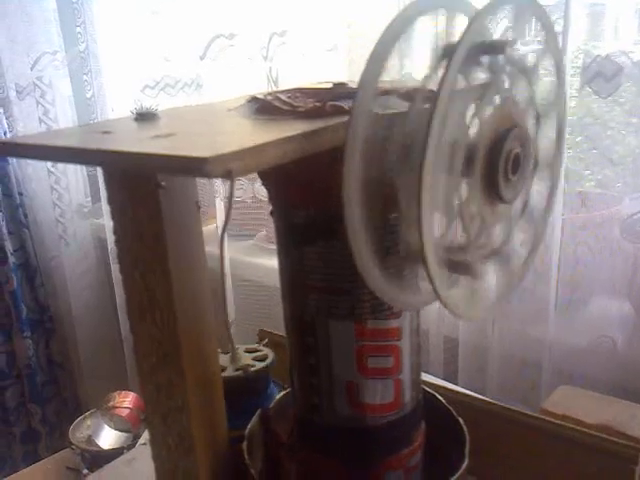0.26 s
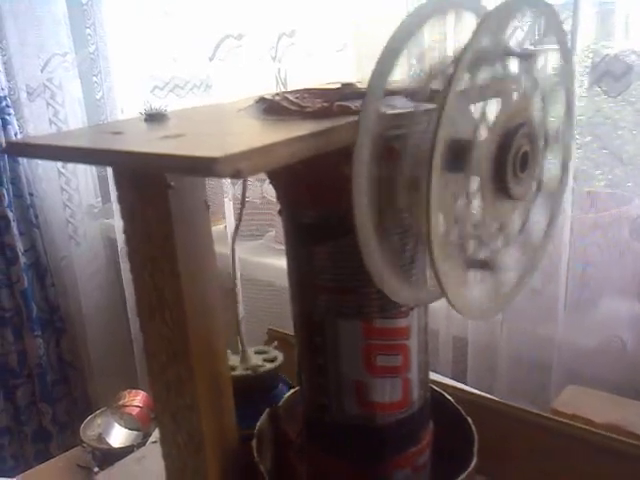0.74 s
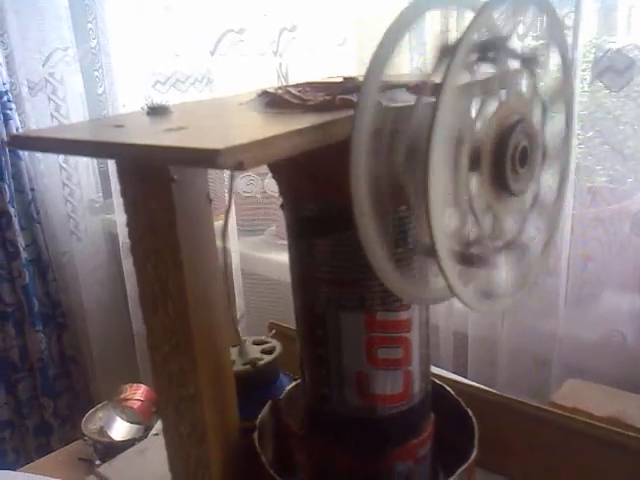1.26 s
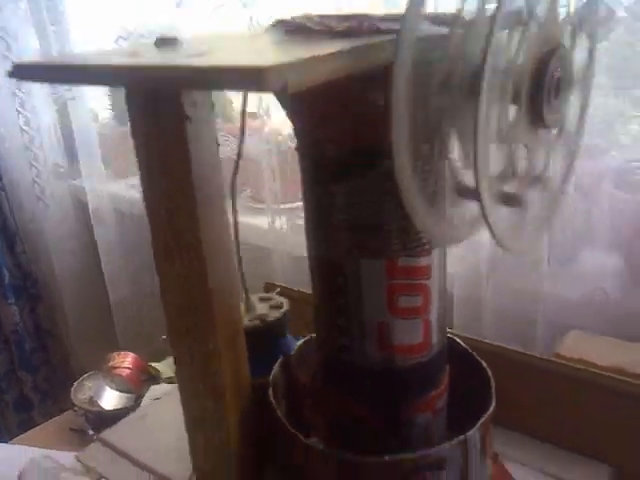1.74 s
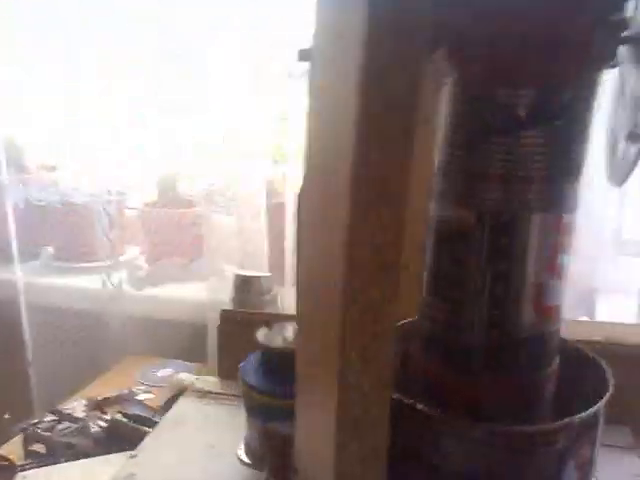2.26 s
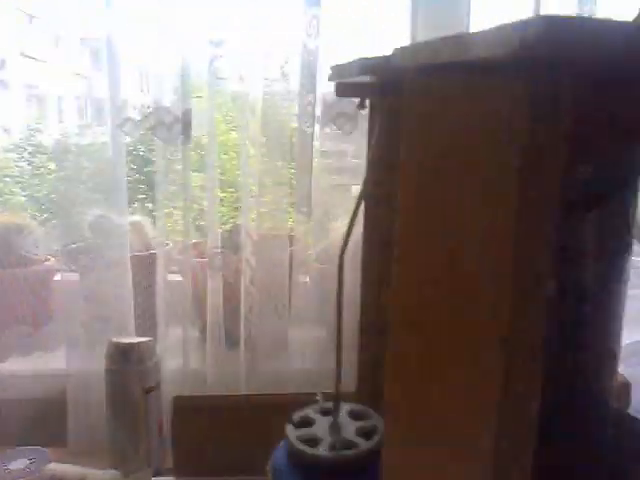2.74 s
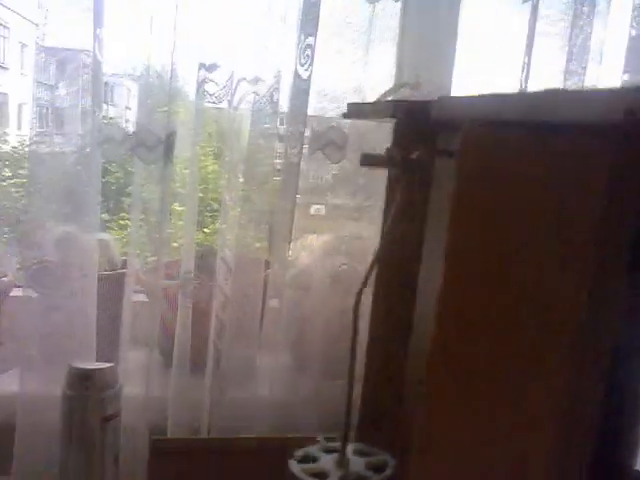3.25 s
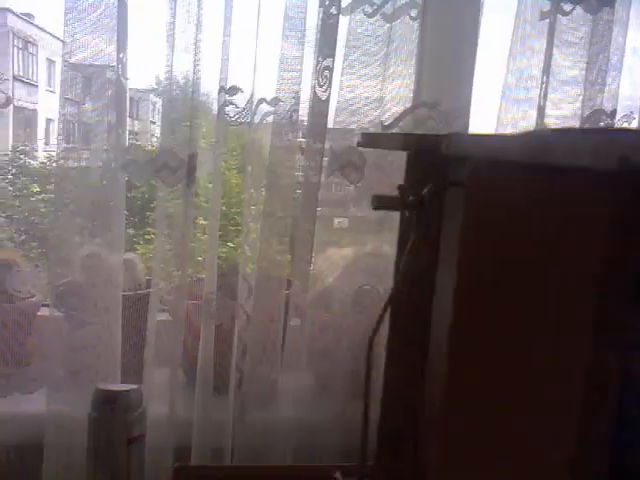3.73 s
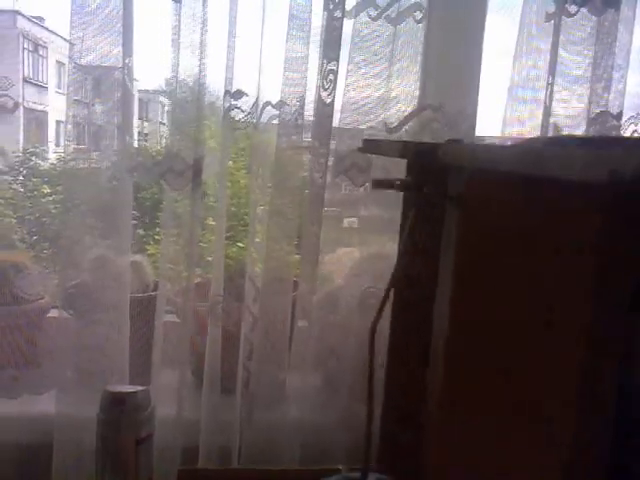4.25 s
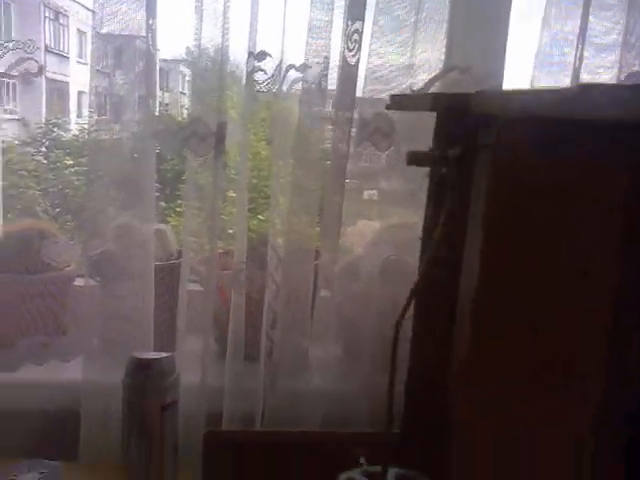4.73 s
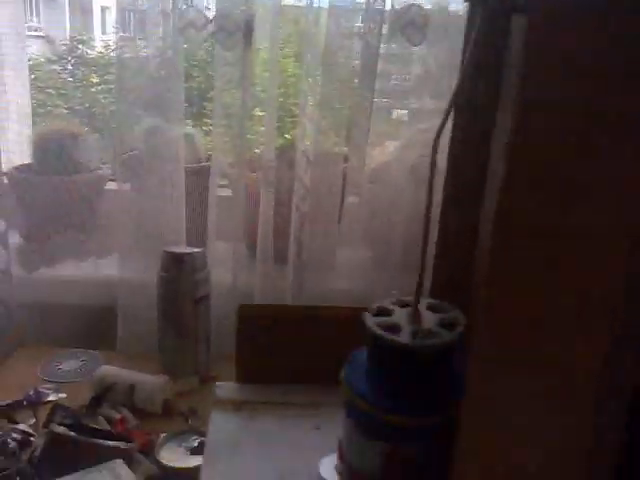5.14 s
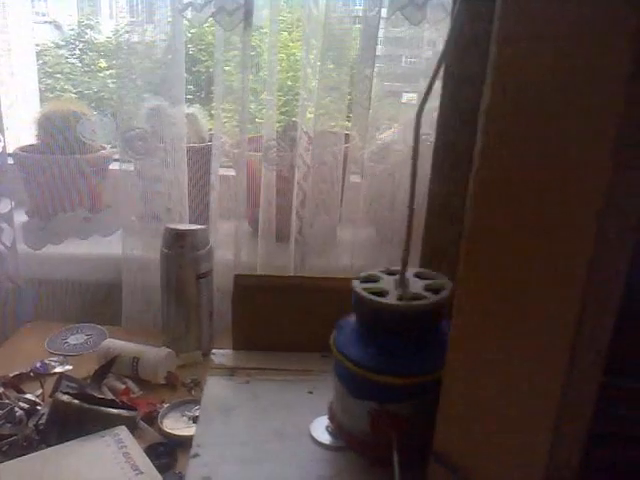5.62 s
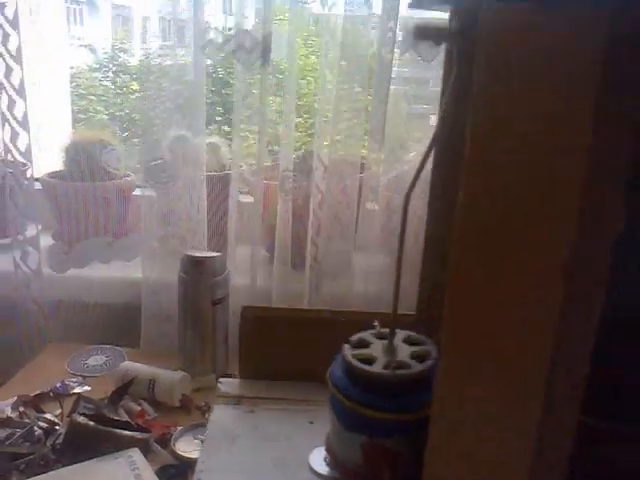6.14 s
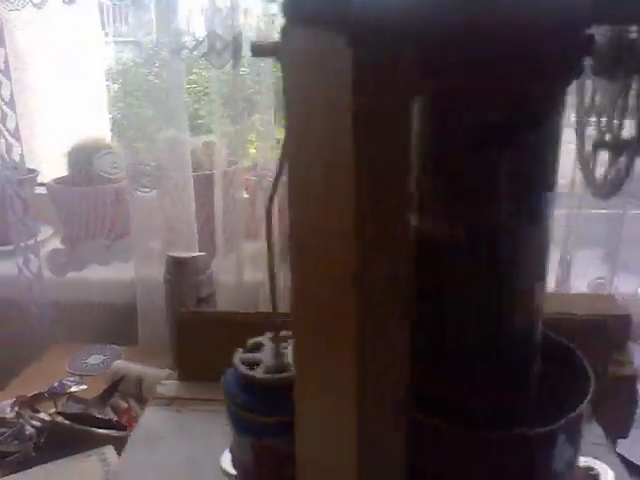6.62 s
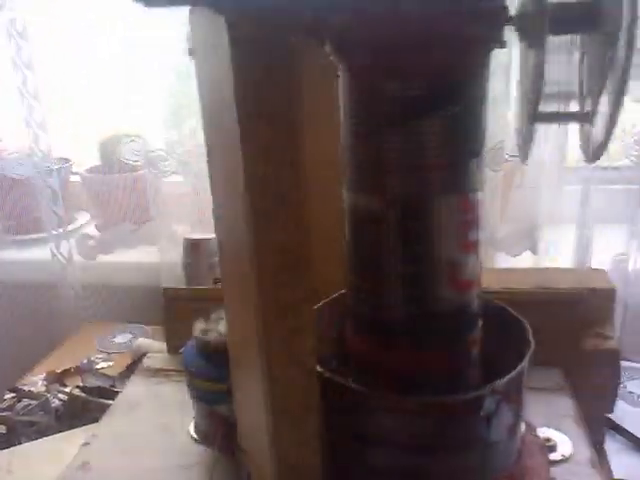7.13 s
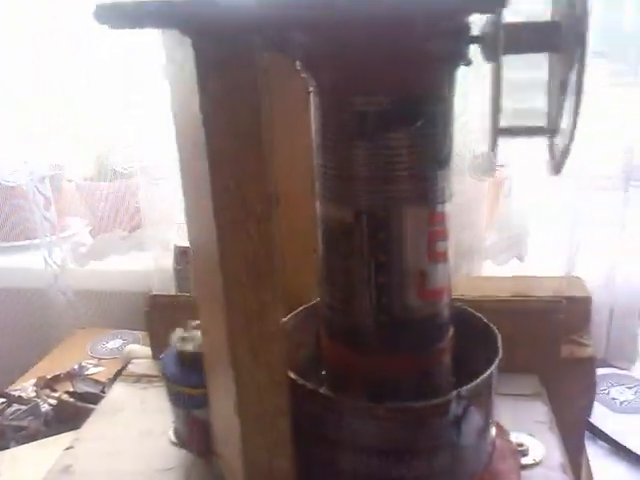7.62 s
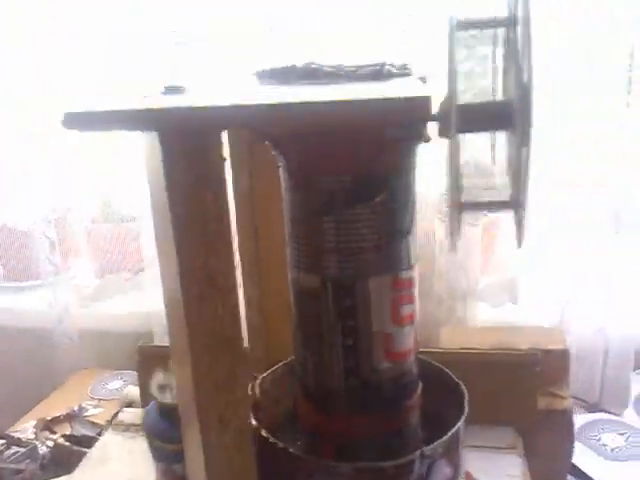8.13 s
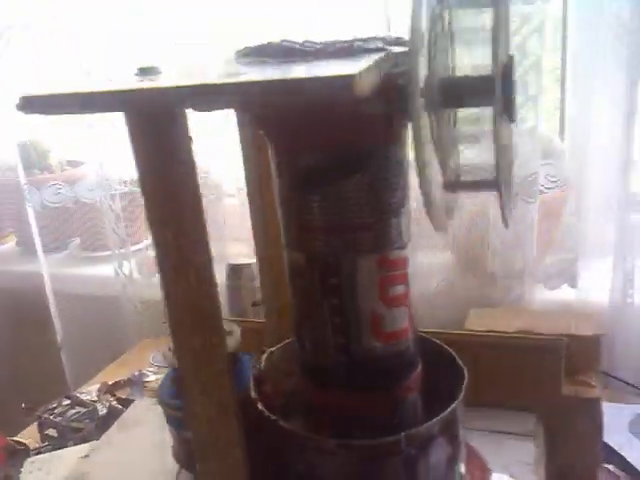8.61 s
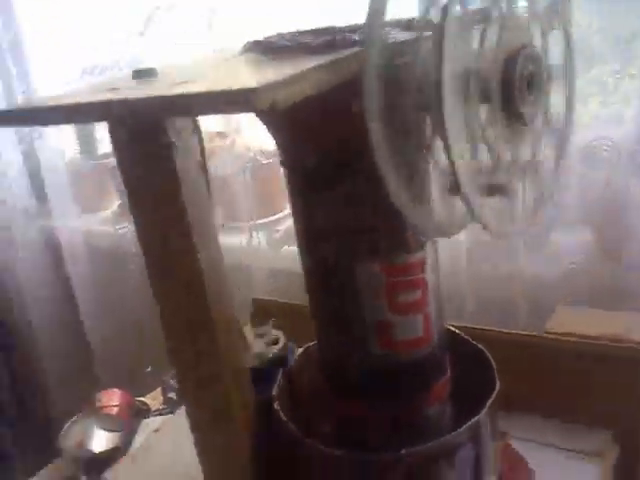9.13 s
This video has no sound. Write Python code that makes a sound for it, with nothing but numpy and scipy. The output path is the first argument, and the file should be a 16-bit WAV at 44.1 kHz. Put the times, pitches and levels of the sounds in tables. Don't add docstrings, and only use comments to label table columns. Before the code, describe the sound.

A small tin-and-wire engine runs without pause, its joints knocking drily some twenty times a second, alternately stronger and weaker. Thin wire ticks and brief metallic ringing edge each knock, with soft rubbing and low hum beneath. Heard close in a curtained room, it grows louder and duller after two seconds as the microphone moves to the crank side, then eases back near the end. A loose rod slaps in irregular bunches, mostly before six and a half seconds.

```python
import sys
import numpy as np
from scipy import signal
from scipy.fft import rfft, irfft
from scipy.io import wavfile
from scipy.ndimage import uniform_filter1d

SR = 44100
rng = np.random.default_rng(int(sys.argv[2]) if len(sys.argv) > 2 else 0)


def inscribe(sig):
    pcm = np.round(np.clip(np.atleast_2d(sig).T, -1, 1) * 32767)
    wavfile.write(sys.argv[1], SR, pcm.astype(np.int16))


def gain_from_decibels(decibels):
    exponent = np.asarray(decibels, float) / 20
    return 10 ** exponent


N = 412770

# start_s, place (0 flywheel front, 1 crank side, 2 flywheel edge)
PHONE_PATH = [
    (0, 0),
    (1.9, 0.05),
    (2.3, 1),
    (6.2, 1),
    (7.5, 1.85),
    (8.6, 2),
    (9.4, 2),
]
# start_s, speed_turns_per_s
CRANK_SPEED = [(0, 10.646), (0.42, 10.792), (1.65, 10.86), (2.02, 10.627), (2.99, 10.887), (3.77, 10.881),
               (4.09, 10.775), (5.11, 10.849), (6.23, 10.546), (6.66, 10.8), (7.18, 10.86), (8.0, 10.707),
               (8.88, 10.752), (9.4, 10.707)]
# start_s, top_knock_db, link_tick_db
DISTANCE_LEVELS = [(0, -17, -29), (.6, -15.5, -29.5), (1.95, -15.5, -28.5), (2.25, -10.5, -25.5),
                   (2.6, -10, -27.5), (3.4, -11.5, -29), (6.1, -11, -29), (6.55, -12, -30.5),
                   (7.9, -14, -29.5), (9.4, -16.5, -33)]
BOTTOM_UNDER_DB = -4.5, -7, -6.5
# start_s, chatter_db
ROD_PLAY = [(0, -42.5), (1.2, -34.5), (1.9, -41.5), (2.7, -55), (3.8, -39.5), (4.6, -37), (4.75, -45),
            (6.1, -43), (6.5, -54), (7.3, -47), (7.65, -35.5), (9.4, -36.5)]
# delay_ms, front_push, side_push, edge_push (pushes as signed share)
TOP_CONTACTS = [(0.27, -1.13, -0.46, -0.67), (1.55, 0.09, -0.25, -0.51), (2.38, 1.15, 1.17, 1.13),
                (6.52, -0.24, -0.49, -0.5), (11.56, -0.2, 0.27, -0.1), (16.02, -0.1, 0.01, -0.1)]
BOTTOM_CONTACTS = [(-1.08, 1.18, 1.21, 1.26), (0.06, -0.69, -0.22, 0.24), (3.13, 0.55, 0.36, 0.55),
                   (6.7, 0.01, 0.14, 0.17), (13.81, 0.12, 0.08, 0.1)]
# pitch_hz, t60_s, front_swing, side_swing, edge_swing (swings as signed gain)
TOP_FRAME_MODES = [(522, 0.019, -1.01, 0.18, -0.14), (587, 0.017, 0.5, 0.17, 0.32),
                   (656, 0.067, -0.12, 0.06, 0.03), (748, 0.027, 0.17, 0.4, 0.42),
                   (827, 0.057, 0.42, 0.24, 0.43), (887, 0.053, 1.09, 0.36, 0.74),
                   (957, 0.036, 0.89, 2.04, -0.29), (1016, 0.13, -0.3, -0.02, 0.76),
                   (1092, 0.012, 0.7, -0.23, 1.32), (1112, 0.11, 0.08, 0.33, 0.31),
                   (1190, 0.023, -0.74, -0.09, -1.34), (1299, 0.13, -0.1, -0.17, -0.25),
                   (1372, 0.068, -0.96, -0.68, -0.06), (1429, 0.13, 1.75, -0.12, 0.05),
                   (1555, 0.012, -1.17, -0.69, -1.04), (1669, 0.012, -0.13, -1.56, -0.8),
                   (1788, 0.051, 0.14, -0.17, 0.11), (1949, 0.027, 0.02, -0.83, -0.49),
                   (2150, 0.025, -0.17, 0.0, -0.47), (2666, 0.012, -0.25, -0.12, -0.67),
                   (2919, 0.012, -0.36, -0.66, -0.71), (3405, 0.006, -0.01, -1.5, -0.13)]
BOTTOM_FRAME_MODES = [(501, 0.13, 0.0, -0.12, -0.1), (571, 0.041, -0.13, -0.66, -1.1),
                      (645, 0.021, -1.29, 0.83, 1.01), (772, 0.031, 0.18, 1.39, 0.61),
                      (853, 0.13, 0.98, 0.42, 0.19), (883, 0.038, 2.62, 0.91, 0.78),
                      (980, 0.059, -0.85, 0.31, -0.74), (997, 0.018, 0.18, 0.35, 2.17),
                      (1120, 0.079, 0.21, 0.08, 0.28), (1164, 0.012, -0.82, -2.11, -1.34),
                      (1215, 0.107, 0.08, 0.11, 0.17), (1303, 0.059, 0.06, -0.85, -1.04),
                      (1353, 0.13, -0.12, -0.08, -0.17), (1468, 0.017, -0.92, -1.2, -2.23),
                      (1569, 0.035, -0.26, 1.43, 1.7), (1657, 0.021, 0.51, -0.81, -0.35),
                      (1776, 0.053, -0.6, 1.19, 0.13), (1975, 0.049, -0.48, 0.21, -0.09)]
# delay_ms, length_ms, level_db
TOP_TICKS = [
    (-5.5, 3.5, -0.5),
    (27.5, 7.7, -10.5),
]
BOTTOM_TICKS = [
    (-6, 1.42, -6.5),
    (-2.5, 4, -9.5),
    (0, 3.1, -24),
    (21, 5.5, -46),
]
LINK_MODES = [(2280, 0.02, 0, -22, 0.5), (3685, 0.0058, 3.5, 5.5, 5), (4420, 0.018, -4.5, 0.5, -1),
              (4740, 0.014, -13, -6, -7), (5677, 0.012, -7.5, -4.5, -1.5), (6060, 0.015, -3, -2, -4),
              (7020, 0.013, -12.5, -7, -4), (8900, 0.0071, -26, -10, -14), (9680, 0.012, -17, -16, -14),
              (11250, 0.0055, -12.5, -23, -16), (14000, .004, -21, -15, -21)]
ROD_MODES = [(1040, .02, 16, -22, 10), (2080, 0.02, 9, 2, 6), (3045, 0.032, 6, 4, 6),
             (4420, 0.041, -8, -13, -4.5), (6500, 0.0079, -10, -13, -7), (7400, 0.022, -16, -10, -15),
             (10200, 0.0086, -13, -9, -13)]
BOARD_MODES = [(333.4, 0.47, -33, -29, -31.5), (391, 0.089, -26, -18, -20), (432.6, 0.17, -42, -27.5, -30),
               (471.5, 0.16, -26, -19, -18.5), (640, 0.057, -30, -17, -14.5), (1090, 0.062, -8, -12, -13),
               (1793, 0.14, -16, -18, -17), (1870, 0.038, -19, -7, -18), (2026, 0.058, -17, -46, -12.5),
               (2230, 0.053, -31, -17.5, -20)]
PIN_MODES = [(8560, 0.0024, -2, 4, 2), (10400, 0.0037, -1, 4, 2), (12000, 0.0037, -2, 3, 0),
             (14500, 0.0045, -9, 3, -6)]
CRACK_MODES = [(2660, 0.0026, 11, -30, -23), (3050, 0.0049, 9.5, -7, 1), (4140, 0.013, -6, -4.5, -4),
               (5000, 0.0038, -7, -2.5, -8), (6450, 0.011, -16, -15.5, -13), (7880, 0.0029, -9, -6.5, -18),
               (11000, 0.0047, -14, -12, -17), (13800, .003, -22, -11, -19)]
SHIVER_MODES = [(1090, 0.014, 8, -13, 10), (1910, 0.0054, -10, -2, -5), (2230, 0.014, -8, -6.5, -3),
                (2950, 0.011, -2, -0.5, -1), (3250, 0.0073, 2, -5, 1), (4340, 0.0077, -13, -8, -8),
                (5170, 0.031, -13, -21, -16), (6630, 0.011, -15, -12, -15), (8000, 0.0093, -13.5, -21, -20),
                (11800, .005, -19, -14, -26)]
# pitch_hz, t60_s, top_swing, bottom_swing (swings in thousandths)
BASE_MODES = [(35, 0.241, 4.0, -0.3), (56, 0.3, -3.0, 2.4), (86, 0.05, 60, -96), (118, 0.3, 29.0, -15.4),
              (139, 0.031, 6.8, 67.6), (167, 0.3, 4.1, -5.9), (206, 0.03, -29.3, 49.2),
              (242, 0.193, -5.6, 7.4), (279, 0.091, -43.5, 14.3), (331, 0.03, 13.7, -11.9),
              (334, 0.158, -14.8, 10.1), (376, 0.3, -10.4, 7.0), (409, 0.126, 2.0, 6.3)]
# start_s, peak_db
SLAPS = [(0.047, -5.5), (0.5156, -18.5), (0.608, -17), (0.701, -16), (1.07, -17), (1.3496, -18),
         (1.622, -22), (1.713, -6.5), (1.806, -11), (1.8991, -6.5), (1.996, -23.5), (2.1803, -1),
         (2.276, -16), (2.368, -13), (2.4627, -21), (5.047, -13), (5.1371, -5.5), (5.2316, -26),
         (5.4166, -14.5), (5.5083, -5.5), (5.603, -20), (5.6954, -11.5), (5.7885, -7), (5.8832, -8),
         (5.978, -11), (6.0709, -7.5), (6.1646, -9.5), (6.263, -18), (6.5436, -20)]
# start_s, peak_db
REBOUNDS = [(1.91, -12), (5.1476, -11), (5.5187, -13), (5.8007, -14)]
# pitch_hz, t60_s, level_db
GUIDE_MODES = [(935, 0.014, -1), (1440, 0.0058, 9), (1934, 0.014, -3.5), (2090, 0.017, -4),
               (2740, 0.012, -8), (3330, 0.016, -2.5), (4570, 0.033, -28), (5270, 0.038, -37.5),
               (6800, 0.017, -31), (7840, 0.013, -19.5), (11950, 0.0052, -14)]
# pitch_hz, density_db (per Hz)
RUB_COLOUR = [(30, -3.5), (120, -3), (300, -1), (470, -3), (640, -3), (1100, 3), (1600, -15), (2200, -6),
              (3300, -19), (4400, -18.5), (5200, -22.5), (7000, -28), (16000, -32)]
# pitch_hz, density_db (per Hz)
HISS_COLOUR = [(2000, -1), (5000, 0), (8000, -13.5), (10000, 4), (12500, -9.5), (16000, -2)]


def nearness(s, place):
    where = np.interp(s, *np.transpose(PHONE_PATH))
    return np.clip(1 - abs(where - place), 0, 1)


def ring(hz, t60, swing):
    t = np.arange(int(SR * max(t60)))[:, None] / SR
    decay = 1000. ** (-t / t60)
    return (np.sin(2 * np.pi * hz * t) * decay) @ swing


def blows(s, size):
    out = np.zeros(N + 2)
    at = np.clip(s * SR, 0, N)
    i = at.astype(int)
    np.add.at(out, i, size * (1 - at + i))
    np.add.at(out, i + 1, size * (at - i))
    return out[:N]


def through(x, response):
    return signal.oaconvolve(x, response)[:N]


def turns():
    first_top_turn = .1305
    t = np.arange(N) / SR
    angle = np.cumsum(np.interp(t, *np.transpose(CRANK_SPEED))) / SR - first_top_turn
    top = np.interp(np.arange(int(angle[-1]) + 1), angle, t)

    chance = rng.standard_normal((4, len(top)))
    knock_scatter_db, tick_scatter_db, chatter_scatter_db = .2, 1.1, 1.4
    s, knock_db, tick_db = np.transpose(DISTANCE_LEVELS)
    knock_db = np.interp(top, s, knock_db)
    tick_db = np.interp(top, s, tick_db) + tick_scatter_db * chance[2]
    under_db = sum(db * nearness(top, place) for place, db in enumerate(BOTTOM_UNDER_DB))
    top_db = knock_db + knock_scatter_db * chance[0]
    bottom_db = knock_db + under_db + 2 * knock_scatter_db * chance[1]
    chatter_db = np.interp(top, *np.transpose(ROD_PLAY)) + chatter_scatter_db * chance[3]
    return top, top_db, bottom_db, tick_db, chatter_db


def knock(s, db, contacts, modes):
    scatter_db, slack_ms = .5, .015
    chance = rng.standard_normal((len(s), len(contacts), 2))
    delay_ms, *push = np.transpose(contacts)
    hz, t60, *swing = np.transpose(modes)
    at = s[:, None] + (delay_ms + slack_ms * chance[..., 0]) / 1000
    strength = gain_from_decibels(scatter_db * chance[..., 1])
    out = 0
    for place in range(3):
        heard = (nearness(s, place) * gain_from_decibels(db))[:, None]
        size = heard * push[place] * strength
        out = out + through(blows(at.ravel(), size.ravel()), ring(hz, t60, swing[place]))
    return through(out, np.hanning(19) / 9)


def rattle(s, db, length_ms, modes, count=6, slack=0.061):
    scatter_db = 1.5
    chance = rng.standard_normal((len(s), count, 2))
    late = np.linspace(0, 1, count) ** 1.414 + slack * chance[..., 0]
    way = (-1) ** np.arange(count)
    size = way * (1 - 0.14 * late) * gain_from_decibels(db[:, None] + scatter_db * chance[..., 1])
    at = (s[:, None] + late * length_ms / 1000).ravel()
    hz, t60, *mode_db = np.transpose(modes)
    opposed = (-1) ** np.arange(len(hz))
    out = 0
    for place in range(3):
        heard = blows(at, size.ravel() * nearness(at, place))
        out = out + through(heard, ring(hz, t60, opposed * gain_from_decibels(mode_db[place])))
    return out


def link_ticks(centre, tick_db, ticks):
    delay_ms, length_ms, db = np.repeat(ticks, len(centre), axis=0).T
    s = np.tile(centre, len(ticks)) + delay_ms / 1000
    level_db = np.tile(tick_db, len(ticks)) + db - 6.5
    return rattle(s, level_db, length_ms[:, None], LINK_MODES)


def board_ring(top, bottom, top_db, bottom_db):
    s = np.r_[top + .0024, bottom - .001]
    return rattle(s, np.r_[top_db - 2.5, bottom_db - 1.5], 0.16, BOARD_MODES, count=1)


def pin_spit(top, bottom, tick_db):
    s = np.r_[bottom - .0022, top + .0372]
    return rattle(s, np.r_[tick_db - 17, tick_db - 22], 4.5, PIN_MODES)


def base_hum(top, bottom):
    side_db = -0.5
    hz, t60, top_swing, bottom_swing = np.transpose(BASE_MODES)
    size = gain_from_decibels(side_db * nearness(top, 1)) / 1000
    hum = through(blows(top + .00147, size), ring(hz, t60, top_swing))
    return hum + through(blows(bottom - .00197, size), ring(hz, t60, bottom_swing))


def engine():
    bottom_turn = .548
    top, top_db, bottom_db, tick_db, chatter_db = turns()
    bottom = top + bottom_turn * np.gradient(top)

    out = knock(top, top_db - 1.5, TOP_CONTACTS, TOP_FRAME_MODES)
    out += knock(bottom, bottom_db - 3.0, BOTTOM_CONTACTS, BOTTOM_FRAME_MODES)
    out += link_ticks(top, tick_db, TOP_TICKS)
    out += link_ticks(bottom, tick_db, BOTTOM_TICKS)
    out += rattle(top + .038, chatter_db + 3, 2.51, ROD_MODES, count=1, slack=0.15)
    out += board_ring(top, bottom, top_db, bottom_db)
    out += pin_spit(top, bottom, tick_db)
    out += rattle(top + 0.0028, top_db - 13.0, 1.035, CRACK_MODES, count=3)
    return out, base_hum(top, bottom)


def slaps():
    s, db = np.transpose(SLAPS + REBOUNDS)
    hz, t60, mode_db = np.transpose(GUIDE_MODES)
    blow = through(blows(s - .0003, gain_from_decibels(db - 8.5)), ring(hz, t60, gain_from_decibels(mode_db)))
    rod = through(blow, np.hanning(15) / 6)
    rod += rattle(s + 0.000955, db - 19.5, 4, SHIVER_MODES, slack=0.1007)
    return signal.sosfilt(signal.butter(2, 650, "high", fs=SR, output="sos"), rod)


def noise(colour, db):
    hz, shape_db = np.transpose(colour)
    bin_hz = np.arange(N // 2 + 1) * SR / N + 1
    gain = gain_from_decibels(np.interp(np.log(bin_hz), np.log(hz), shape_db))
    x = irfft(rfft(rng.standard_normal(N)) * gain, N)
    return x / np.std(x) * gain_from_decibels(db)


def rub(knocks):
    shaken = signal.lfilter([.0015], [1, -.9985], knocks ** 2)
    flicker = uniform_filter1d(rng.standard_normal(N), 300) * np.sqrt(300)
    loose = (shaken / np.mean(shaken) + .05) ** .14 * gain_from_decibels(2 * flicker)
    side = nearness(np.arange(N) / SR, 1)
    rubbing = loose * noise(RUB_COLOUR, -37 - 3.5 * side)
    hiss = loose ** 2.2 * noise(HISS_COLOUR, -63 + 2 * side)
    return rubbing + hiss


def room(x):
    t60_s, level_db, dull_hz = .33, -17, 3800
    t = np.arange(SR // 2) / SR
    onset = np.clip(t / .02, 0, 1) ** 2
    tail = rng.standard_normal(len(t)) * 1000. ** (-t / t60_s) * onset
    tail = signal.lfilter(*signal.butter(1, dull_hz, fs=SR), tail)
    return x + gain_from_decibels(level_db) * through(x, tail / np.sqrt(np.sum(tail ** 2)))


def scene():
    knocks, base = engine()
    knocks += slaps()
    return (room(knocks) + base + rub(knocks))[None]


def roll_off(x):
    return signal.sosfilt(signal.butter(12, 15930, fs=SR, output="sos"), x)


def record(dry):
    ceiling, top_hz = .73, 15900
    held = dry / (1 + abs(dry / ceiling) ** 8) ** (1 / 8)
    held = signal.sosfilt(signal.ellip(8, .2, 70, top_hz, fs=SR, output="sos"), held)
    return roll_off(held)


dry = scene()
out = record(dry)
inscribe(out)
```